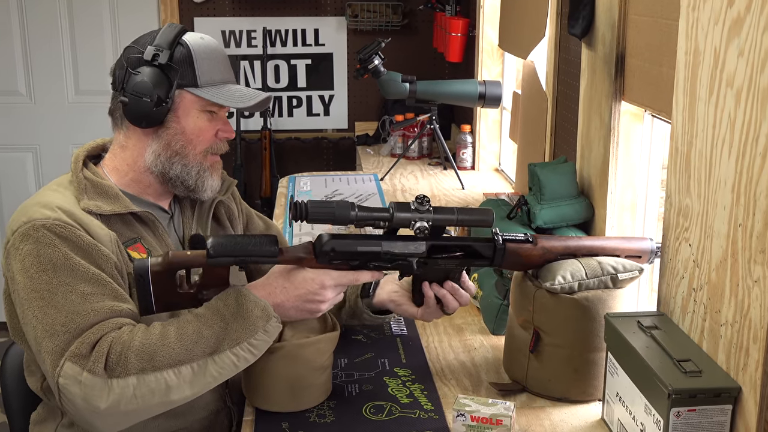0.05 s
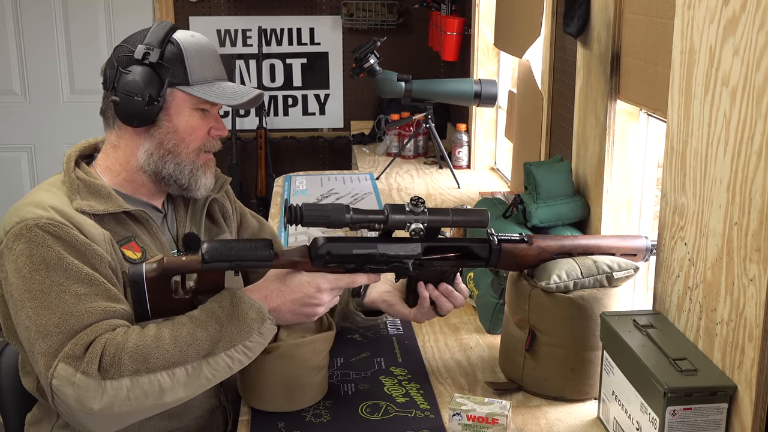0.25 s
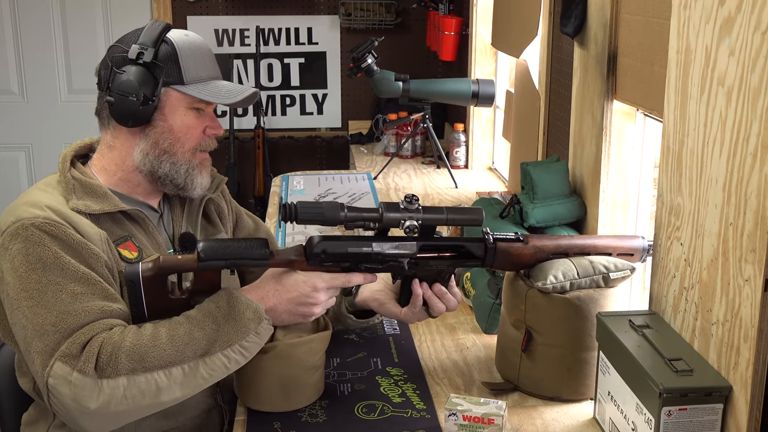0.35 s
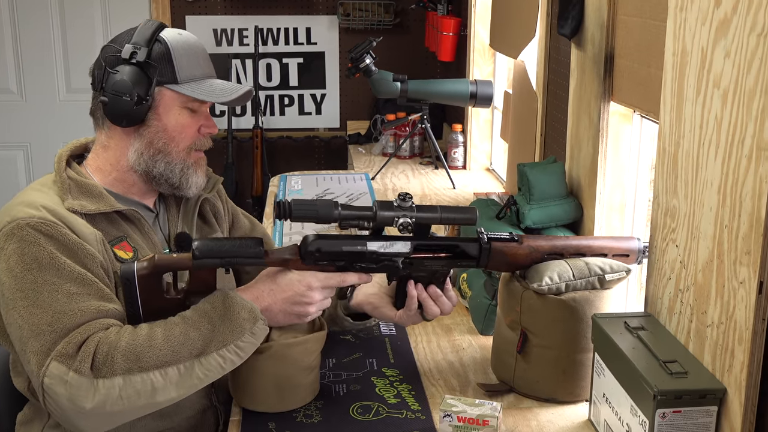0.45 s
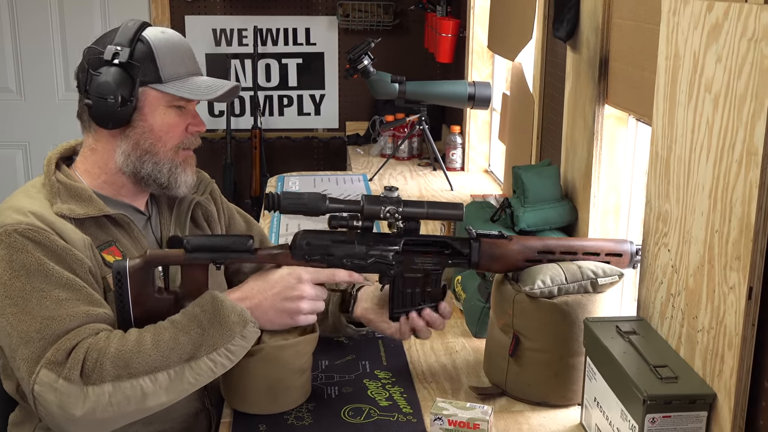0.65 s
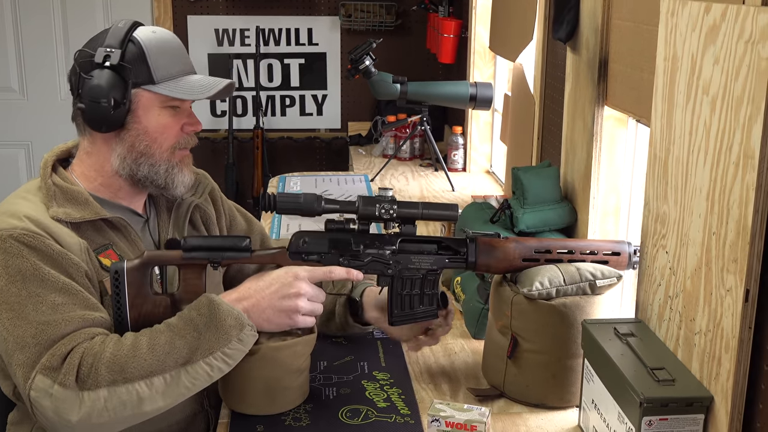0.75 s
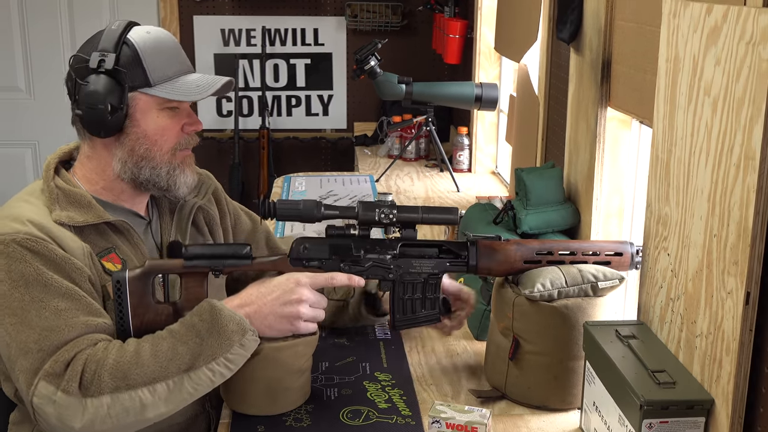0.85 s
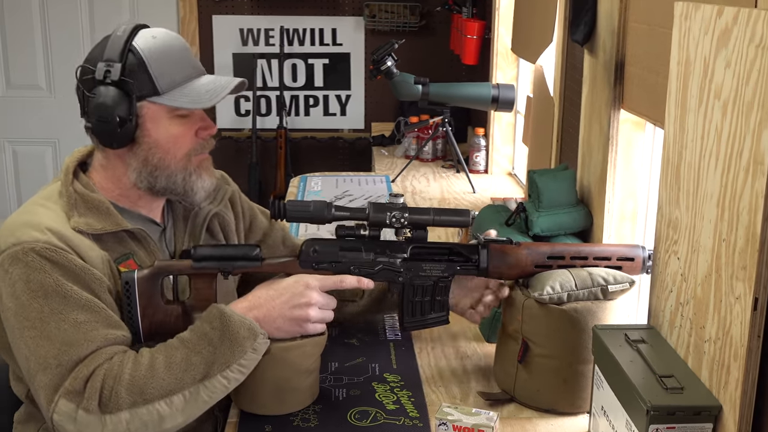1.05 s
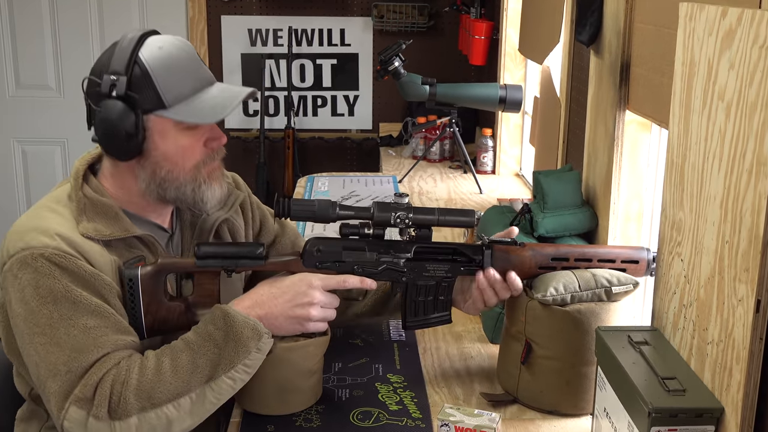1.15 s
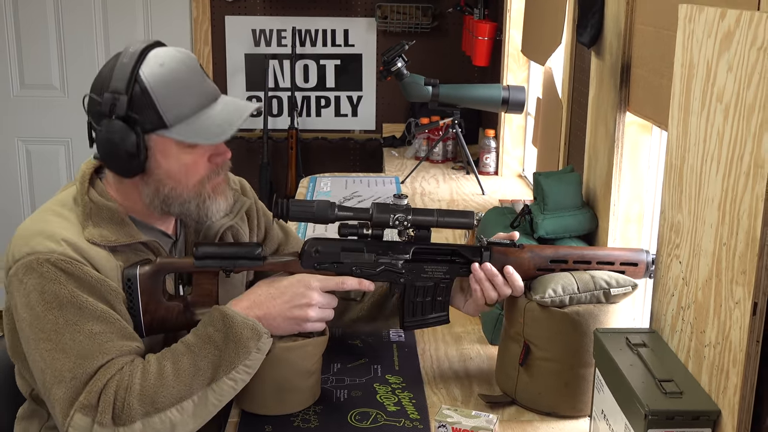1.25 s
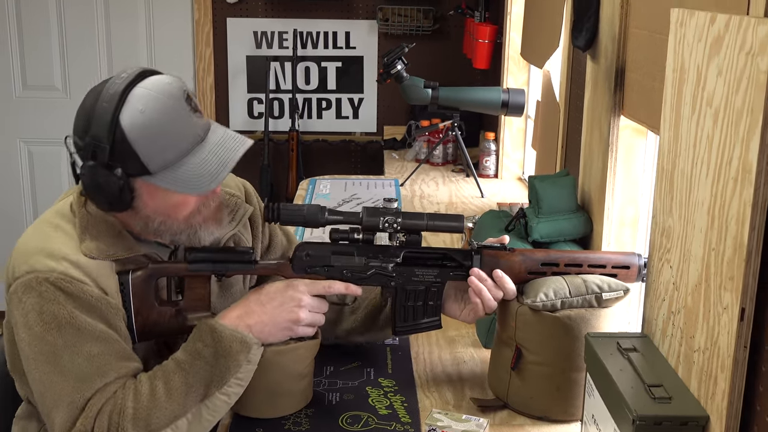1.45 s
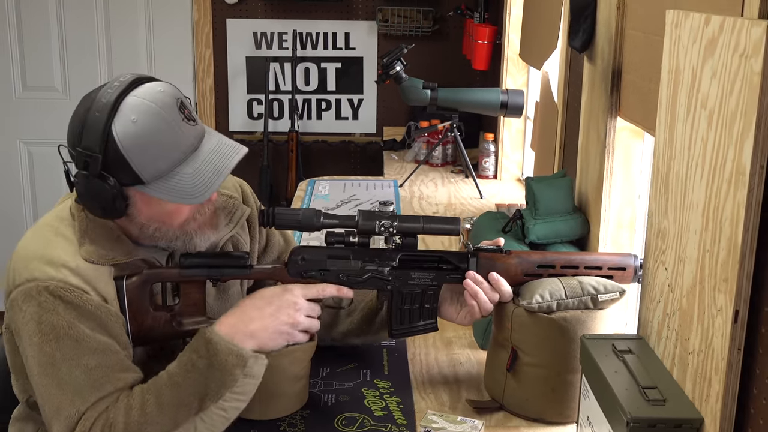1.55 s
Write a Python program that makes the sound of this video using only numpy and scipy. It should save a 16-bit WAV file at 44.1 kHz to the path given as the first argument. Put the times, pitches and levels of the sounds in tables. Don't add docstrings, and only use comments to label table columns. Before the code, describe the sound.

A rifle magazine locks in: brief rattle and hollow knock, a lighter steel clack, then a much louder snap with rattling contents, followed by soft hand thumps and sleeve rustle, close microphone in a small wooden room.

```python
import sys
import numpy as np
from scipy import signal
from scipy.fft import rfft, irfft
from scipy.io import wavfile
from scipy.ndimage import uniform_filter1d

SR = 44100
rng = np.random.default_rng(int(sys.argv[2]) if len(sys.argv) > 2 else 0)


def file_out(sig):
    cols = np.atleast_2d(sig).T
    lim = np.clip(cols, -1, 1)
    pcm = np.round(lim * 32767).astype(np.int16)
    wavfile.write(sys.argv[1], SR, pcm)


def gain_from_db(level_db):
    decades = np.asarray(level_db, float) / 20
    return 10 ** decades


N = 70560


def ring(x, hz, t60):
    pole = np.exp(2j * np.pi * hz / SR - np.log(1000) / (max(t60, .002) * SR))
    return signal.lfilter([1], [1, -pole], x).imag


def band(x, hz, width_hz):
    return signal.lfilter(*signal.iirpeak(min(hz, .45 * SR), hz / width_hz, fs=SR), x)


def band_noise(source, hz, width_hz):
    return band(band(source, hz, width_hz), hz, width_hz)


def unit(x):
    return x / np.sqrt(np.mean(x ** 2))


def walk(rate):
    k = int(SR / rate)
    steps = np.repeat(rng.standard_normal(N // k + 1), k)
    w = uniform_filter1d(uniform_filter1d(steps, k), k)[:N]
    return (w - w.mean()) / w.std()


def bump(s, width_s):
    out = np.zeros(N)
    first = max(int((s - 5 * width_s) * SR), 0)
    last = min(int((s + 5 * width_s) * SR) + 1, N)
    k = np.arange(first, last)
    out[k] = np.exp(-.5 * ((k / SR - s) / width_s) ** 2)
    return out


def curve_db(table, column=1, outside_db=-120):
    t = np.array(table)
    return np.interp(np.arange(N) / SR, t[:, 0], t[:, column], left=outside_db, right=outside_db)


def softness(hz, contact_ms):
    return np.exp(-(np.pi * hz * contact_ms / 1000) ** 2 / 2)


# f/Hz, width/Hz, level/dB
CRACK = [(328, 150, -26), (2580, 8600, -15.5), (7840, 2500, -18.5), (9890, 4900, -23.5), (12035, 2000, -11),
         (14900, 1800, -29)]
STEEL_CYCLES = 40
SKID_S, CRACK_T60_S, BLOW_SPREAD_DB = .00024, .011, 7.77


def steel(blows, modes, level_db, crack_db):
    t, out = np.arange(N) / SR, 0
    chance = rng.random((len(blows), len(modes) + len(CRACK), 2))
    skids = [bump(s, SKID_S) for s, db, ms in blows]
    for k, (hz, db, t60) in enumerate(modes):
        force = np.zeros(N)
        for (s, blow_db, ms), skid, (extra, phase) in zip(blows, skids, chance[:, k]):
            on = skid > 0
            push = gain_from_db(blow_db + BLOW_SPREAD_DB * extra) * softness(hz, ms) * 2 * skid[on] / skid.sum()
            force[on] += push * np.cos(2 * np.pi * (hz * t[on] + phase))
        out = out + gain_from_db(db) * ring(force, hz, min(t60, STEEL_CYCLES / hz))

    fades = []
    for (s, db, ms), skid in zip(blows, skids):
        decay = np.exp(-np.log(1000) * np.abs(t - s) / CRACK_T60_S)
        fades.append(np.where(t < s, skid, decay))
    for hz, width, db in CRACK:
        fade = sum(gain_from_db(blow_db) * softness(hz, ms) * f for (s, blow_db, ms), f in zip(blows, fades))
        out = out + gain_from_db(db + crack_db) * fade * unit(band_noise(rng.standard_normal(N), hz, width))
    return gain_from_db(level_db) * out


# t/s, level/dB, contact/ms
LATCH_BLOWS = [(.3436, -33.5, 0.055), (.3459, -22.5, 0.069), (.3500, -32, 0.09), (.3550, -12.5, .15),
               (.3563, -15, .15), (.3577, -13.5, 0.082), (.3592, 2.5, 0.022), (.3601, -4, 0.016),
               (.3619, -4.5, .03), (.3641, -13, .03), (.3678, -35, .02), (.3735, -23.5, .04),
               (.3765, -29, .04), (.3835, -26.5, 0.035), (.4178, -32, .04), (.4325, -18.5, .04)]
# f/Hz, level/dB, t60/s
LATCH_MODES = [(402.18, -22.5, 0.0093), (643.3, -13, 0.022), (952, -30, 0.012), (1318.2, -16, 0.014),
               (1600, -15, 0.011), (1986.7, -9.5, 0.011), (2588, -32.5, 0.0086), (2942.6, -6, 0.0082),
               (3550, -0.5, 0.007), (3994, 6, 0.0054), (4665, 1.5, .011), (5390, 0, .008),
               (6017, -8.5, .01), (12100, -8.5, .008)]


def latch():
    return steel(LATCH_BLOWS, LATCH_MODES, level_db=-13.5, crack_db=5.5)


# t/s, level/dB, contact/ms
LUG_BLOWS = [
    (.2185, -19.5, 0.127),
    (.2248, -25.5, .16),
    (.2290, -16, 0.026),
    (.2298, -0.5, 0.0143),
    (.2323, -10, 0.035),
    (.2415, -24.5, .05),
    (.2550, -32, 0.046),
]
# f/Hz, level/dB, t60/s
LUG_MODES = [(421.3, -15, 0.019), (628.7, -10.5, 0.019), (850, -18.5, .012), (1350, -12.5, 0.0066),
             (1710.4, -11.5, 0.013), (2221.4, -22.5, 0.014), (2554.5, -28.5, 0.0104), (3178, -13.5, 0.0103),
             (3963.5, -2.5, 0.013), (4394, -2, 0.0046), (4840, -0.5, 0.011), (5340, -1, .006),
             (6700, -15.5, 0.0049)]


def lug():
    return steel(LUG_BLOWS, LUG_MODES, level_db=-21.5, crack_db=-7.5)


# t/s, level/dB, f/Hz, t60/s
KNOCKS = [(.004, -41.5, 726, 0.1006), (.139, -55.5, 579.6, 0.125), (.529, -42, 444, 0.0116),
          (0.5488, -37, 604.2, 0.0335), (.557, -51.5, 1764, 0.044), (.6158, -41, 603.3, 0.0413),
          (1.220, -41, 584, 0.0333), (1.2362, -36, 588.3, 0.0532)]
KNOCK_PUSH_S = 0.0007
KNOCK_UPPER, KNOCK_UPPER_DB = 1.6045, -5


def knocks():
    t, out = np.arange(N) / SR, 0
    for s, db, hz, t60 in KNOCKS:
        push = bump(s, KNOCK_PUSH_S)
        push = 2 * push / push.sum()
        for f, tone_db, decay in ((hz, 0, t60), (hz * KNOCK_UPPER, KNOCK_UPPER_DB, t60 * 0.317)):
            out = out + gain_from_db(db + tone_db) * ring(push * np.cos(2 * np.pi * f * (t - s)), f, decay)
    return out


# t/s, level/dB
RATTLE_BEFORE = [(0.0, -32.5), (0.01, -46.5), (0.11, -71), (0.14, -78.5)]
RATTLE_LUG = [(.231, -39.5), (.236, -39), (.25, -48.5), (.3, -59.5), (.335, -86)]
RATTLE_LATCH = [(.364, -49), (.372, -24.5), (.382, -36.5), (.41, -32), (.42, -37), (.44, -36), (.47, -44),
                (.51, -50.5), (.58, -61.5)]
# f/Hz, width/Hz, level/dB
RATTLE = [(674.8, 210, -17), (1406, 370, -12), (2165.4, 150, -2.5), (2436.4, 90, -4.5), (3082, 170, -1.5),
          (3684, 300, -6), (4011, 88, 1.5), (4251, 40, 4), (4542, 150, -0.5), (4878, 670, -8),
          (6250, 2300, -18.5), (8750, 4500, -27), (10130, 2500, -21), (14000, 2500, -43)]
RATTLE_PER_S, RATTLE_SCATTER_DB, RATTLE_SMEAR_S = 3700, 2.5, 0.0023
EARLY_TILT_DB_PER_OCT, LUG_TILT_DB_PER_OCT = -11, -8.5
DULLING_PER_OCT = 0.2


def rattle():
    happens = rng.random(N) < RATTLE_PER_S / SR
    hits = happens * gain_from_db(RATTLE_SCATTER_DB * rng.exponential(size=N))
    gate = signal.lfilter([1], [1, -np.exp(-1 / (RATTLE_SMEAR_S * SR))], hits)
    parts = [(hz, gain_from_db(db) * band(gate * rng.standard_normal(N), hz, w)) for hz, w, db in RATTLE]
    shakes = ((RATTLE_BEFORE, EARLY_TILT_DB_PER_OCT), (RATTLE_LUG, LUG_TILT_DB_PER_OCT), (RATTLE_LATCH, 0))
    out = 0
    for table, tilt in shakes:
        db = curve_db(table)
        dull = DULLING_PER_OCT * np.maximum(db - db.max(), -40)
        tilted = [(hz, gain_from_db(tilt * np.log2(hz / 3000)) * p) for hz, p in parts]
        norm = np.std(sum(p for hz, p in tilted))
        fading = sum(gain_from_db(dull * max(np.log2(hz / 4000), 0)) * p for hz, p in tilted)
        out = out + gain_from_db(db) / norm * fading
    return out


# t/s, level/dB, width/ms
JOLT = [
    (.3594, -25.5, .7),
    (.3621, -28.5, 1.3),
    (.372, -42.5, 4),
]


def jolt():
    return -sum((-1) ** k * gain_from_db(db) * bump(s, ms / 1000) for k, (s, db, ms) in enumerate(JOLT))


# t/s, level/dB, f/Hz
THUMPS = [(.003, -45, 71), (.022, -41.5, 70), (.035, -49.5, 72), (0.256, -44.5, 109), (.270, -44.5, 75),
          (0.299, -48, 90), (0.309, -50.5, 90), (0.431, -40.5, 150.6), (0.482, -53, 54.5),
          (0.233, -53, 171), (.243, -45.5, 150), (0.784, -47.5, 220), (0.913, -33.5, 196),
          (.945, -54.5, 81), (1.011, -50.5, 89.7), (1.065, -63.5, 120.4), (1.111, -42.5, 109),
          (1.136, -47.5, 161), (1.147, -45, 150), (1.181, -54, 120), (1.214, -49, 118), (1.224, -49.5, 128),
          (1.27, -44, 350), (1.291, -53.5, 150), (1.326, -59.5, 100), (1.3683, -36.5, 216),
          (1.379, -50.5, 180), (1.422, -44.5, 79.5), (1.445, -51.5, 130)]
# t/s, level/dB, f/Hz
RELEASES = [(.028, -45.5, 70), (.264, -48, 75), (0.95, -47, 69), (.971, -50, 70), (1.105, -52.5, 90),
            (1.295, -49.5, 171), (1.351, -51, 150), (1.372, -54.5, 110), (1.412, -48, 60)]
THUMP_CYCLES = 0.309


def thumps():
    t, out = np.arange(N) / SR, 0
    for sign, table in ((1, THUMPS), (-1, RELEASES)):
        for s, db, hz in table:
            lean = 0.51 * rng.standard_normal()
            swing = np.cos(2 * np.pi * hz * (t - s) + lean)
            out = out + sign * gain_from_db(db) * bump(s, THUMP_CYCLES / hz) * swing
    return out


# t/s, length/s, level/dB
RUBS = [(0.876, 0.05704, -49.5), (1.339, 0.0569, -51.5), (1.501, 0.077, -56)]
# f/Hz, width/Hz, level/dB
RUB = [(350, 255, 2), (1112.2, 111, -4), (1682, 1156, 3), (3422, 936, -3), (5100, 1010, -4.5),
       (10500, 3600, -14.5)]
RUB_EDGE_S, RUB_GRAIN_DB = .024, 1.8


def rubs():
    t, press = np.arange(N) / SR, 0
    grit = gain_from_db(RUB_GRAIN_DB * walk(590)) * rng.standard_normal(N)
    for s, length, db in RUBS:
        edge = np.minimum(t - s, s + length - t) / RUB_EDGE_S + .5
        press = press + gain_from_db(db) * np.clip(edge, 0, 1) ** 2
    return press * unit(sum(gain_from_db(db) * unit(band_noise(grit, hz, w)) for hz, w, db in RUB))


# t/s, level/dB, brightness/dB per octave
SLEEVE = [(0, -67, -1), (.33, -61, -2), (.5, -58, -1), (.58, -57.5, 0.5), (.68, -54.5, 2), (.78, -54.5, -1),
          (.87, -63.5, -0.5), (.95, -65, -3), (1.02, -73, -0.67), (1.09, -64, 2), (1.13, -59.5, 2.5),
          (1.2, -58, 0), (1.32, -59, -1), (1.43, -58, -0.5), (1.5, -54.5, -1), (1.55, -50, -0.5),
          (1.58, -50.5, -1), (1.6, -56, -2.5)]
# f/Hz, level/dB per Hz
CLOTH = [(150, -3), (1800, -6.5), (2700, -11), (4000, -8.5), (6200, -11.5), (8000, -22.5), (11000, -17),
         (15800, -32)]
CLOTH_FLICKER_DB, CLOTH_GRAIN_DB = 2.5139, 1.2849


def sleeves():
    level_db, tilt = curve_db(SLEEVE), curve_db(SLEEVE, column=2, outside_db=0)
    cloth_hz, cloth_db = np.transpose(CLOTH)
    f = np.maximum(np.arange(N // 2 + 1) * SR / N, 1)
    noise = rfft(gain_from_db(CLOTH_GRAIN_DB * walk(400)) * rng.standard_normal(N))
    noise = noise * gain_from_db(np.interp(np.log(f), np.log(cloth_hz), cloth_db)) * (f > cloth_hz[0])
    out = 0
    for hz in 150 * 2 ** (np.arange(28) / 4):
        share = np.clip(1 - 4 * np.abs(np.log2(f / hz)), 0, 1)
        flicker = gain_from_db(tilt * np.log2(hz / 2000) + CLOTH_FLICKER_DB * walk(24.894))
        out = out + flicker * irfft(noise * share, N)
    return gain_from_db(level_db) * out / np.std(irfft(noise, N))


# t/s, level/dB
TICKS = [(.172, -72), (.589, -70), (1.1145, -65), (.835, -70), (1.2406, -64), (1.3384, -64), (1.4025, -62),
         (1.4316, -63), (1.465, -72), (1.514, -65)]
TICK_HZ, TICK_WIDTH_HZ, TICK_S = 10500, 3000, 0.00175


def ticks():
    puffs = sum(gain_from_db(db) * bump(s, TICK_S) for s, db in TICKS)
    return puffs * unit(band(rng.standard_normal(N), TICK_HZ, TICK_WIDTH_HZ))


# t/s, level/dB
GRIP = [(0, -1.5), (.2, -2), (.3, -1), (.45, 1), (.55, -5), (.85, -4), (.95, 0.5), (1.08, -0.5), (1.15, 7),
        (1.3, 3), (1.45, 2), (1.6, 1.5)]


def grip_db():
    return curve_db(GRIP)


RUMBLE_HZ, RUMBLE_DB, RUMBLE_WALK_DB = 64.4, -63.5, 2


def rumble():
    low = band(band(rng.standard_normal(N), RUMBLE_HZ, 63), RUMBLE_HZ, 120)
    return gain_from_db(RUMBLE_DB + grip_db() + RUMBLE_WALK_DB * walk(7.3)) * unit(low)


HUM_HZ, HUM_WIDTH_HZ, HUM_DB = 90.5, 7, -63.5


def hum():
    return gain_from_db(HUM_DB + 0.66 * grip_db()) * unit(band(rng.standard_normal(N), HUM_HZ, HUM_WIDTH_HZ))


# f/Hz, width/Hz, level/dB, unevenness/dB
CREAK = (328.5, 251.5, -68.5, 4)


def creak():
    hz, width, db, uneven_db = CREAK
    level = gain_from_db(db + 1.255 * grip_db() + uneven_db * walk(30))
    return level * unit(band_noise(rng.standard_normal(N), hz, width))


ROOM_T60_S, ROOM_DB = .15, -30.5


def room(hits):
    t = np.arange(N // 4) / SR
    echoes = rng.standard_normal(len(t)) * np.exp(-np.log(1000) * t / ROOM_T60_S)
    echoes = echoes * (t > .003)
    wet = signal.fftconvolve(hits, echoes / np.sqrt(np.sum(echoes ** 2)))[:N]
    return gain_from_db(ROOM_DB) * wet


def scene():
    hits = latch() + lug() + knocks()
    box = hits + room(hits) + rattle()
    hands = jolt() + thumps() + rubs()
    cloth = sleeves() + ticks()
    background = rumble() + hum() + creak()
    return (box + hands + cloth + background)[None]


HISS_DB, LIMIT, TOP_HZ = -83, .64, 15900


def band_limit(x):
    return signal.sosfilt(signal.butter(12, 16430, fs=SR, output="sos"), x)


def record(dry):
    hissy = dry + gain_from_db(HISS_DB) * rng.standard_normal(N)
    rounded = LIMIT * np.tanh(hissy / LIMIT)
    top_cut = signal.ellip(8, .3, 70, TOP_HZ, fs=SR, output="sos")
    mix = signal.sosfilt(top_cut, rounded)
    return band_limit(mix)


dry = scene()
out = record(dry)
file_out(out)
```